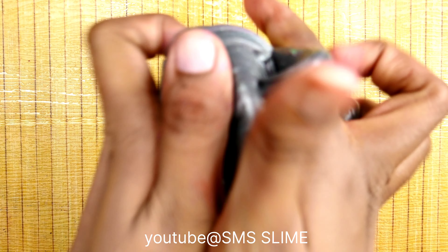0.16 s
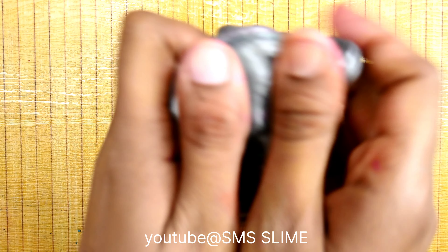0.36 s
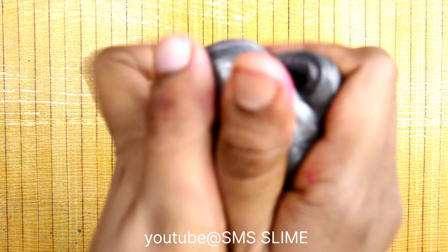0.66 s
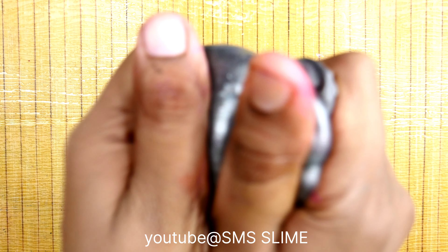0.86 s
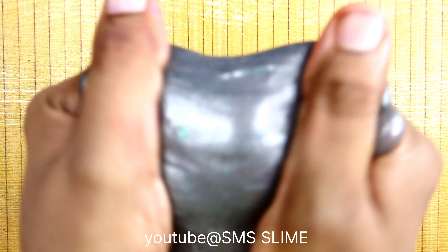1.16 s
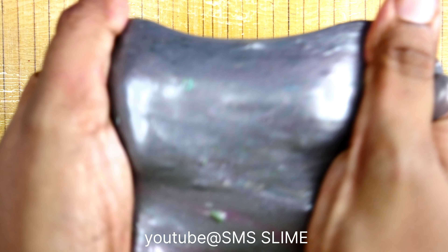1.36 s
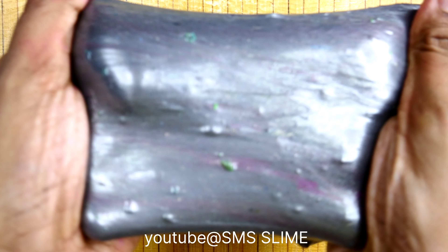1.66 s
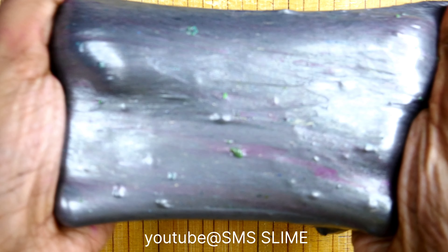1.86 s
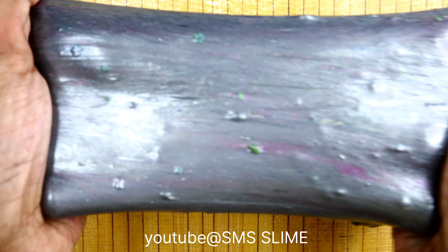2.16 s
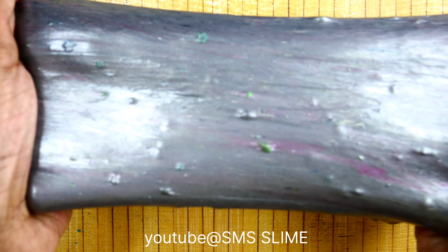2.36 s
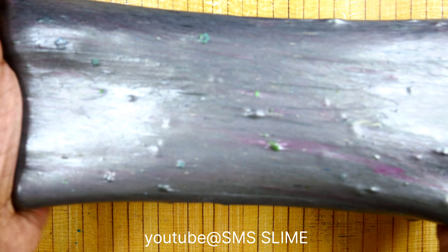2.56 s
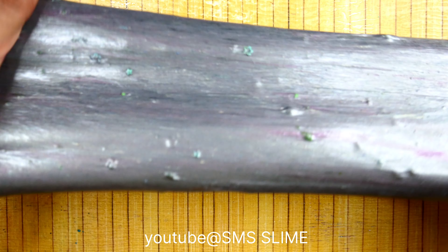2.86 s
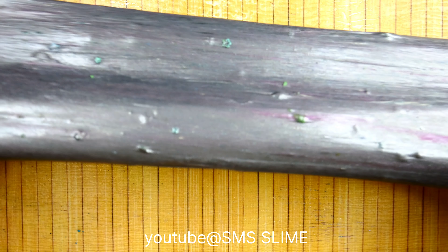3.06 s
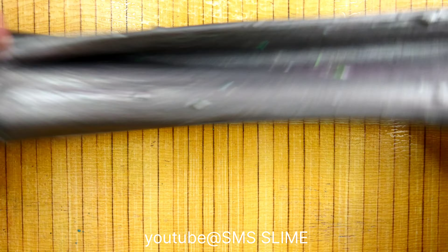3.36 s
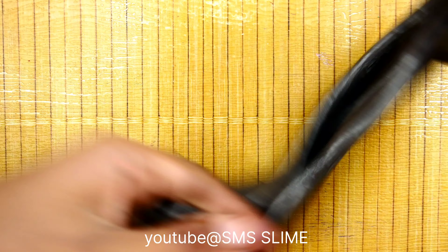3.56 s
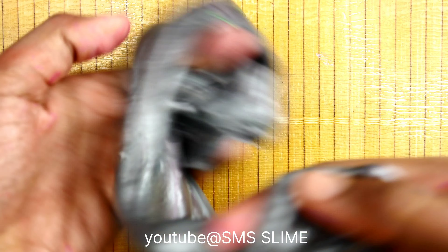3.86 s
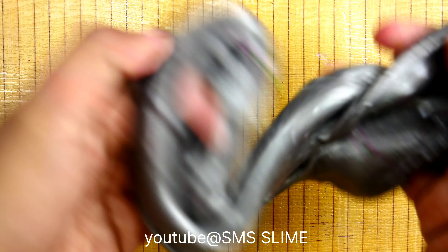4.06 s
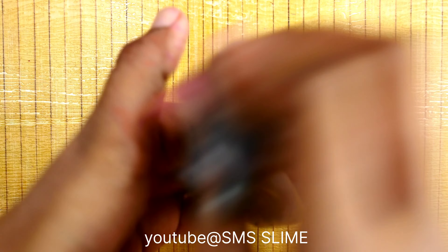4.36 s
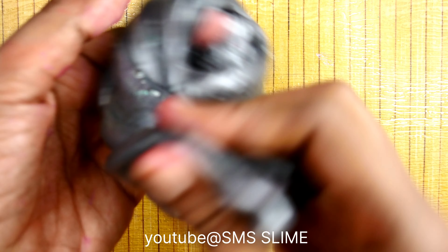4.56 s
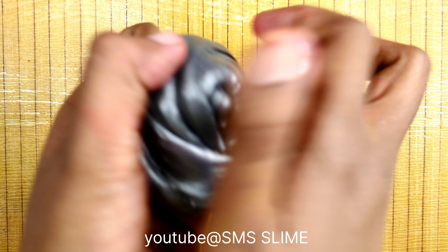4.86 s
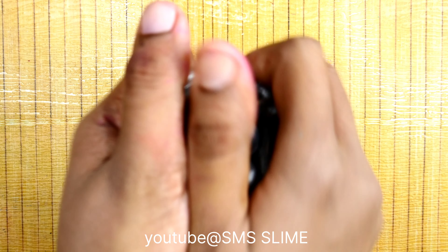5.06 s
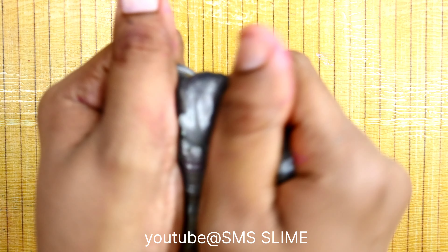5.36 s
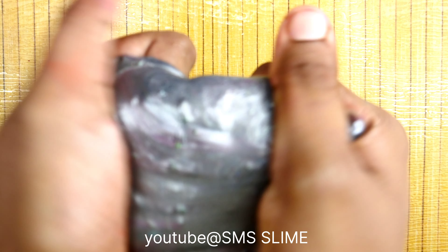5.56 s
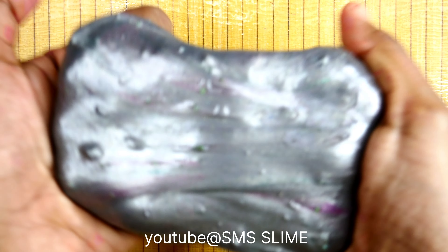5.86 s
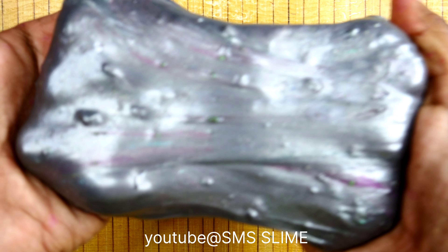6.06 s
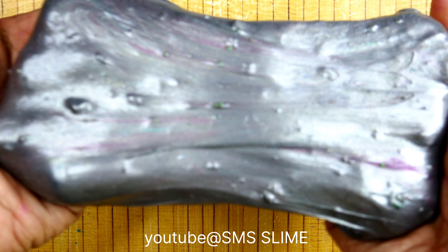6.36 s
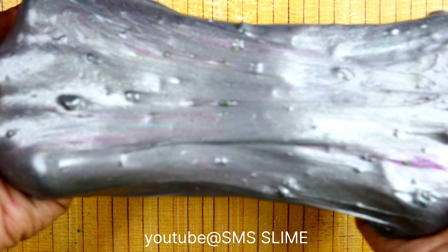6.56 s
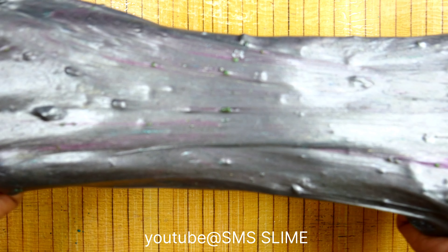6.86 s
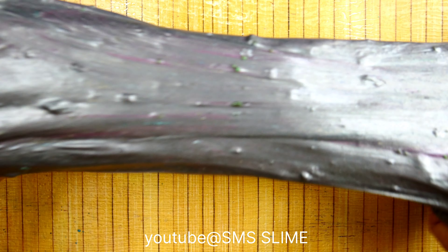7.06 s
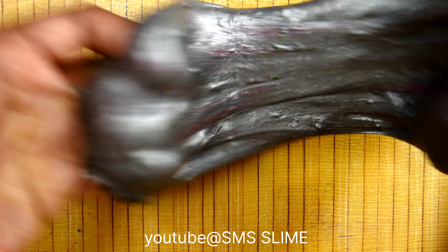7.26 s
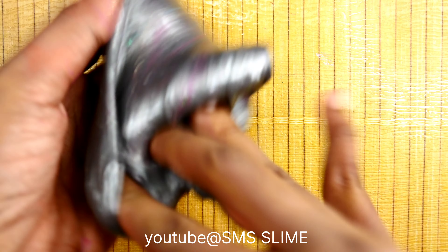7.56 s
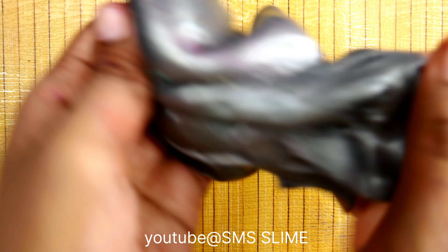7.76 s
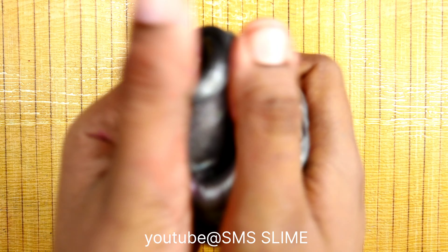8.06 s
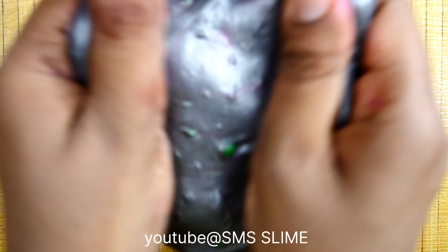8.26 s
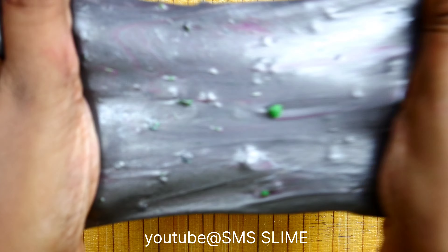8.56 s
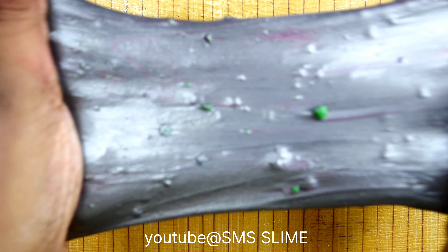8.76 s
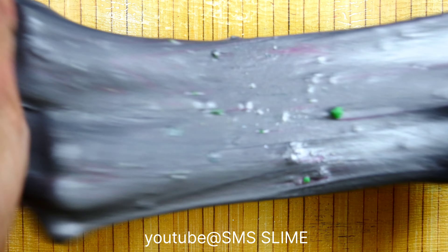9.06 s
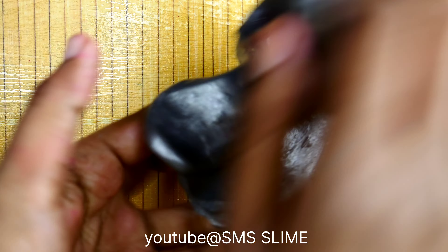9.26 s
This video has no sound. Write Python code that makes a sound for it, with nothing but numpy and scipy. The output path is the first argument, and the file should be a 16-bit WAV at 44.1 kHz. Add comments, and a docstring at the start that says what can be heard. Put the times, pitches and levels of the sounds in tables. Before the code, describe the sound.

Close up, slime gives off sticky crackles and small snapping bubbles as it is squeezed by hand. It goes quieter while being pulled out, then returns with a small plop, soft squelches and more clusters of pops as it is folded and kneaded again. Under it is the steady low hum of a fan in a small room, joined by a distant rumble in the last second or so.

```python
"""Kneading slime

Two hands knead, stretch and fold sticky slime close to the microphone in a small room.
Threads snap in dense crackle as it peels off the skin, trapped air pockets pop, and air squelches
through folds. Behind it a fan and the mains hum steadily; a low rumble swells near the end."""
import sys
import numpy as np
from scipy import signal
from scipy.fft import rfft, irfft, next_fast_len
from scipy.io import wavfile

SR = 44100
rng = np.random.default_rng(int(sys.argv[2]) if len(sys.argv) > 2 else 0)


def generate_wav(signal):
    """Clip the signal to [-1, 1] and save it as 16-bit WAV at the path in sys.argv[1]."""
    frames = np.transpose(np.atleast_2d(signal))
    scaled = np.clip(frames, -1, 1) * 32767
    pcm = np.round(scaled).astype(np.int16)
    wavfile.write(sys.argv[1], SR, pcm)


N = 414540

# Patches peeling off the skin. Each row: start in seconds, length in seconds, crackle level in dB,
# hollow rustle and sticky fizz in dB re the crackle.
PEEL_EVENTS = [ (0.089, 0.054, -57, -5, 4), (0.285, 0.08, -55.5, -9, 2), (0.452, .035, -56, -0.5, 1.5),
               (0.606, 0.029, -59, 3, 4), (0.673, .05, -59, -11, 4), (0.793, 0.023, -66, -11, -2),
               (0.936, 0.033, -52, -19, 4.5), (1.003, 0.093, -61, -3.5, -2), (1.615, 0.047, -69, -8, 4),
               (2.865, 0.13, -58.5, -6, 2.5), (3.038, 0.045, -61, -8, 2.5), (3.171, 0.013, -54.5, -3, 7.5),
               (3.276, 0.016, -51, -3, 6), (3.357, 0.071, -57.5, -7.5, 7), (3.425, 0.023, -47.5, -9, 2),
               (3.763, 0.039, -56.5, 1, 6), (3.837, 0.018, -46.5, -5, -7.5), (3.967, 0.049, -58, -11, -8),
               (4.11, 0.039, -59, -3, 6.5), (4.259, .01, -56, -4.5, -1), (4.645, 0.016, -60, -2, 4.5),
               (4.739, 0.061, -56, -6.5, -1), (4.95, 0.037, -44, -3, -1), (5.11, 0.023, -53.5, -23, -7),
               (5.304, 0.031, -51, 2.5, 3), (5.394, 0.12, -55.5, -7, 0), (5.567, 0.071, -60.5, -3.5, 5.5),
               (5.985, 0.061, -62.5, -2.5, 4), (6.102, 0.0084, -56.5, -7, -6),
               (6.794, 0.027, -61, -8, -2.5), (7.07, 0.022, -64, 5, 11.5), (7.193, 0.047, -51.5, -4, 3.5),
               (7.278, 0.014, -56.5, 4.5, 9), (7.338, 0.064, -62.5, 5.5, 7.5),
               (7.503, 0.01, -61.5, 4, 11.5), (7.591, 0.032, -64, -1, 7), (7.806, 0.046, -48, -8, -1.5),
               (7.98, 0.012, -52.5, -4, 4.5), (8.158, 0.0089, -61, 0, 4), (8.193, 0.073, -61, -5, -2.5),
               (9.091, 0.072, -53.5, -5, 6), (9.163, 0.077, -50, -3.5, 0), (9.39, 0.0085, -50.5, -5, -10)]
# Effort of the hands. Each row: time in seconds, reference level in dB for faint crackle and small pops.
KNEADING_CURVE = [(0.0, -57.5), (0.94, -55), (1.28, -60), (2.04, -70), (2.77, -68), (3.03, -62.5),
                  (3.35, -52), (3.59, -61), (4.03, -56), (4.37, -64.5), (5.44, -55), (5.68, -60.5),
                  (6.39, -66.5), (7.1, -65.5), (7.2, -58), (7.91, -55.5), (8.61, -61), (9.4, -58)]
# Spectra of the peeling layers. Each row: frequency in Hz, relative gain in dB.
HOLLOW_SPECTRUM = [(300, 6), (500, -0.5), (760, -2.5), (1000, 0), (1300, 0), (1800, -3), (2300, -24)]
CRACKLE_SPECTRUM = [(1400, -41), (2000, 1), (3000, 4.5), (4000, 1), (5000, -9.5), (6500, -7)]
FIZZ_SPECTRUM = [(3800, -11), (5200, -0.5), (7500, 1), (9000, 0.5), (11000, -6.5), (15500, -5.5)]
TICK_SPECTRUM = [(900, -8), (12000, 0)]
# Bursting air pockets. Each row: time in seconds, pocket pitch in Hz, pocket level in dB,
# film snap pitch in Hz, snap level in dB, thud level in dB.
POP_EVENTS = [(0.1275, 3590, -40, 6100, -48, -51), (0.2548, 3400, -50, 9000, -46, -57),
              (0.2662, 3400, -29.5, 6100, -27.5, -36.5), (0.6058, 3120, -39, 7600, -36, -58),
              (0.6863, 3680, -36, 5200, -53, -47), (0.741, 3300, -54, 9000, -47, -66),
              (0.791, 3120, -39.5, 11200, -37, -63), (0.8447, 2910, -35.5, 8500, -40.5, -64),
              (0.897, 4000, -37, 6770, -35.5, -54), (0.945, 3500, -51, 8500, -39, -56),
              (0.957, 2840, -33, 7900, -32, -35), (1.06, 2950, -45.5, 6800, -44.5, -60),
              (1.089, 3030, -40.5, 6200, -67, -55), (1.163, 2320, -66, 6000, -68, -52),
              (1.5636, 2210, -74, 10100, -47.5, -76), (1.6317, 2100, -51, 7100, -40.5, -55),
              (2.213, 3020, -35.5, 5400, -47, -58), (2.3726, 1490, -67, 7500, -77, -54),
              (2.5718, 1190, -57, 7700, -66, -54), (3.037, 2870, -55, 6860, -42, -68),
              (3.071, 2880, -52, 6800, -55, -60), (3.172, 2030, -55, 6800, -45, -47),
              (3.2831, 1320, -47, 6500, -42, -42), (3.5376, 1900, -43, 6800, -38, -43.5),
              (4.353, 3000, -62, 6900, -52, -62), (4.73, 4600, -55, 5800, -59, -37.5),
              (4.7398, 4540, -32.5, 6200, -29, -45), (5.202, 3420, -48, 6000, -49, -72),
              (5.279, 2600, -61, 6500, -47, -45), (5.311, 3300, -30.5, 7000, -29, -33),
              (5.33, 2850, -32, 5500, -39, -38.5), (5.3663, 3160, -39.5, 7100, -40, -54),
              (5.4126, 3500, -50, 12000, -35, -53), (5.476, 4830, -46, 6070, -38.5, -47.5),
              (5.6208, 2630, -41, 5930, -41, -57), (5.934, 2400, -52, 6000, -58, -56),
              (6.0193, 2920, -46, 7160, -39.5, -71), (6.425, 3000, -53.5, 6200, -62, -67),
              (6.8167, 3400, -45.5, 5840, -66, -73), (7.084, 4540, -62, 6340, -42, -66),
              (7.744, 2160, -48, 5570, -43.5, -46.5), (7.8398, 3640, -29.5, 5100, -47, -53),
              (8.0067, 5000, -40, 7560, -37, -66), (8.5136, 2670, -38, 6760, -48.5, -49),
              (8.6274, 3100, -47, 7400, -38, -53), (8.793, 1810, -54, 7240, -42.5, -42)]
# Air through folds. Each row: peak time in seconds, pitch in Hz, first resonance's width in Hz,
# level in dB, half length in seconds.
SQUELCH_EVENTS = [(0.135, 520, 500, -47, 0.011), (0.143, 3530, 700, -41.5, 0.015),
                  (0.49, 505, 300, -51.5, 0.0079), (.625, 600, 350, -54, 0.012),
                  (0.699, 444, 303, -52.5, 0.014), (2.884, 3100, 350, -57, 0.019),
                  (3.441, 2020, 400, -46.5, 0.013), (3.785, 1940, 303, -47.5, 0.023),
                  (3.858, 2940, 450, -51.5, 0.018), (4.051, 1364, 90, -69, 0.36),
                  (4.156, 4320, 900, -52.5, 0.026), (4.472, 726, 70, -70, .08),
                  (4.826, 3470, 600, -47.5, .008), (4.925, 1150, 300, -50, 0.016),
                  (7.248, 2690, 200, -49.5, 0.024), (7.518, 1390, 450, -52, .012),
                  (7.841, 1200, 350, -42, 0.0072), (8.245, 1140, 250, -49, 0.0062),
                  (9.245, 575, 300, -51, .009), (9.39, 2380, 600, -50, 0.0085)]
# Room tail. Each row: frequency in Hz, relative gain in dB.
ROOM_SPECTRUM = [(200, -2), (800, 3), (3300, 1), (8000, 1), (16000, 6.5)]
# Stereo width by frequency. Each row: frequency in Hz, side level in dB re the mid.
SIDE_SPECTRUM = [(200, -17), (600, -15), (2500, -19), (5000, -13.5), (9000, -12.5), (20000, -5)]
# Spectra of fan air and distant rumble. Each row: frequency in Hz, relative gain in dB.
FAN_SPECTRUM = [(22, -15), (43, -2), (85, -2.5), (150, -2), (250, -7), (400, -16.5), (700, -23.5),
                (1200, -29.5), (2000, -30.5), (4000, -35.5), (8000, -36), (11000, -36), (15500, -37)]
RUMBLE_SPECTRUM = [(28, -27), (48, -2.5), (65, -4), (85, -3.5), (150, -9.5), (250, -17), (400, -28.5),
                   (700, -44)]
# Hum lines. Each row: frequency in Hz, rms level in dB, waver in dB.
HUM_LINES = [(50, -67.5, 1), (63.2, -67.5, -4), (99.6, -58.5, 2.5), (196.6, -62, 1.5), (299.7, -74, 0)]
# Rumble swell. Each row: time in seconds, level in dB.
RUMBLE_CURVE = [(0, -71), (8.05, -65), (8.2, -47.5), (8.58, -43.5), (8.7, -51), (8.85, -43.5), (9.1, -46),
                (9.4, -45.5)]


def peeling(busy_threads_per_s=2600, busy_db=-56, clump_db=2.5, fold_db=4):
    """Faster peeling snaps more threads; they ring folds that open and close, shifting the colour."""
    hollow_gain, crackle_gain, fizz_gain = peel_gains()
    per_s = busy_threads_per_s * np.sqrt(crackle_gain / from_db(busy_db))
    clumps = from_db(clump_db * drift(rate_hz=55))
    folds = np.zeros(N)
    for hz in np.geomspace(500, 13000, 22):
        opening = from_db(fold_db * drift(rate_hz=22))
        folds += resonance(thread_snaps(per_s / 2, opening) + 1e-18, hz, q=6)
    snaps = thread_snaps(per_s, clumps) + from_db(1.5) * folds * clumps
    ticks = rms_one(coloured(cell_ticks(), TICK_SPECTRUM))
    excitation = rms_one(snaps) + from_db(-7) * ticks
    hollow = hollow_gain * rms_one(coloured(excitation, HOLLOW_SPECTRUM))
    crackle = crackle_gain * rms_one(coloured(excitation, CRACKLE_SPECTRUM))
    fizz = fizz_gain * rms_one(coloured(excitation, FIZZ_SPECTRUM))
    return hollow + crackle + fizz


def peel_gains(kneading_mix_db=(-9, -8, -7.5), release_s=0.024):
    """Gains of rustle, crackle and fizz: each peel builds, holds and dies, adding to the kneading."""
    t = np.arange(0, N, 40) / SR
    power = from_db(curve_at(t, KNEADING_CURVE) + np.array(kneading_mix_db)[:, None]) ** 2
    for start_s, length_s, db, hollow_db, fizz_db in PEEL_EVENTS:
        attack_s = 0.0044 + 0.38 * length_s
        rise = np.minimum(t - start_s, 0) / attack_s
        fall = np.maximum(t - start_s - length_s, 0) / release_s
        gains = from_db(db + np.array([[hollow_db], [0], [fizz_db]]))
        power += (gains * np.exp(rise - fall)) ** 2
    return [np.interp(np.arange(N) / SR, t, np.sqrt(layer)) for layer in power]


def thread_snaps(per_s, clumps, spread_db=-0.5):
    """Tiny threads snap at random, in uneven sizes and in clumps; rms 1."""
    snapped = rng.random(N) < per_s / SR
    sizes = from_db(spread_db * np.minimum(rng.exponential(1, N), 4)) * rng.choice([-1, 1], N)
    return rms_one(snapped * sizes * clumps / np.sqrt(per_s))


def cell_ticks(count=1500, tear_s=0.001):
    """Small air cells burst at random, each with its own size and pitch; rms 1."""
    out, t = np.zeros(N + SR), np.arange(SR // 50) / SR
    for when, pitch, smallness in rng.random((count, 3)):
        tear = rng.standard_normal(len(t)) * np.exp(-t / tear_s)
        tick = resonance(tear, hz=900 * 14 ** pitch, q=3)
        at = int(when * N)
        out[at:at + len(t)] += burst_at_db(tick, -3 * np.log(0.05 + smallness))
    return rms_one(out[:N])


def pops(slack_tear_s=0.0052, taut_above_db=-45, creak_db=-22, creak_s=0.002):
    """A film creaks, breaks and tears on briefly; the pocket rings and the lump thuds."""
    out, lead = np.zeros(N + SR), SR // 100
    t = np.arange(-lead, SR // 20) / SR
    for time_s, pocket_hz, pocket_db, snap_hz, snap_db, thud_db in POP_EVENTS:
        # A taut film pops louder and tears faster.
        excess_db = max(max(pocket_db, snap_db, thud_db) - taut_above_db, 0)
        tear_s = slack_tear_s * from_db(-0.16 * excess_db)
        creak = from_db(creak_db) * np.exp(-abs(t) / creak_s)
        strain = np.where(t < 0, creak, np.exp(-abs(t) / tear_s))
        tear = rng.choice([-1, 1], (3, len(t))) * strain
        tear[:, lead] += 2.5 * np.array([1, -1, 1])  # impulse of the break
        pocket = resonance(resonance(tear[0], pocket_hz, q=2.8), pocket_hz, q=1, order=2)
        snap = resonance(tear[1], snap_hz, q=1.64, order=2)
        thud = resonance(tear[2], hz=800, q=0.52, order=2)
        crack = film_crack(t)
        at = int(time_s * SR) - lead
        for burst, db in (pocket, pocket_db), (snap, snap_db), (thud, thud_db), (crack, snap_db - 11):
            out[at:at + len(t)] += burst_at_db(burst, db)
    return out[:N]


def film_crack(t, decay_s=0.0016):
    """The film breaks at t = 0 with a thin, bright crack."""
    tear = rng.choice([-1, 1], len(t)) * (t >= 0) * np.exp(-abs(t) / decay_s)
    return resonance(tear, hz=13500, q=1.6, order=2)


def plop(time_s=3.2918, pitch_hz=730, peak_db=-29.5, swell_s=0.0024, decay_s=0.0038):
    """One large pocket opens and its air rings at a single pitch."""
    t = np.arange(N) / SR - time_s
    log_envelope = np.maximum(np.minimum(t / swell_s, -t / decay_s), -30)
    return from_db(peak_db) * np.exp(log_envelope) * np.sin(2 * np.pi * pitch_hz * t)


def small_pops(per_s=7, low_hz=2200, high_hz=8000, tear_s=0.0043, above_kneading_db=2.5, spread_db=4.5):
    """Lone little pockets burst at random, louder while the hands work harder."""
    out, t = np.zeros(N + SR), np.arange(SR // 50) / SR
    for when, pitch, size in rng.random((int(per_s * N / SR), 3)):
        db = curve_at(when * N / SR, KNEADING_CURVE) + above_kneading_db + spread_db * (2 * size - 1)
        tear = rng.standard_normal(len(t)) * np.exp(-t / tear_s)
        pop = resonance(tear, hz=low_hz * (high_hz / low_hz) ** pitch, q=2.5, order=2)
        at = int(when * N)
        out[at:at + len(t)] += burst_at_db(pop, db)
    return out[:N]


def squelches():
    """Fluttering air rings a fold of slime, swelling and fading."""
    out = np.zeros(N)
    for peak_s, hz, width_hz, db, half_s in SQUELCH_EVENTS:
        span = np.arange(max(int((peak_s - 3 * half_s) * SR), 0), min(int((peak_s + 3 * half_s) * SR), N))
        swell = np.exp(-0.5 * ((span / SR - peak_s) / half_s) ** 2)
        air = resonance(rng.standard_normal(3 * SR)[:len(span)], hz, q=hz / width_hz)
        fold = resonance(air, hz, q=2.2)
        out[span] += from_db(db) * rms_one(fold * swell) * np.sqrt(np.mean(swell ** 2))
    return out


def room(x, scatter_db=-15, scatter_s=0.005, tail_db=-8.5, t60_s=0.35):
    """A quick scatter off hands and table, then a soft tail."""
    t = np.arange(int(0.6 * SR)) / SR
    tail = coloured(rng.standard_normal(len(t)), ROOM_SPECTRUM) * from_db(-60 * t / t60_s) * (t > 0.005)
    tail *= from_db(tail_db) / np.linalg.norm(tail)
    scatter = rng.standard_normal(len(t)) * np.exp(-t / scatter_s) * (t > 0.001)
    scatter *= from_db(scatter_db) / np.linalg.norm(scatter)
    return x + signal.fftconvolve(x, scatter + tail)[:N]


def stereo_width(x):
    """A fluttering left-right difference widens the sound, mostly in the treble."""
    quadrature = signal.hilbert(x, next_fast_len(N)).imag[:N]
    side = coloured(quadrature * drift(rate_hz=120), SIDE_SPECTRUM)
    return np.array([x + side, x - side])


def fan(level_db=-54.5):
    """Steady noise of moving air."""
    return from_db(level_db) * diffuse_noise(FAN_SPECTRUM, side_db=-20)


def hum(phase_waver_rad=0.48):
    """Fan and mains hum, each line wavering in level and phase."""
    out, t = np.zeros(N), np.arange(N) / SR
    for hz, db, waver_db in HUM_LINES:
        waver = from_db(waver_db * drift(rate_hz=1.35))
        phase_rad = 2 * np.pi * hz * t + phase_waver_rad * drift(rate_hz=1.8)
        out += from_db(db) * rms_one(waver * np.sin(phase_rad))
    return out


def rumble():
    """A distant low rumble swells near the end."""
    level_db = curve_at(np.arange(N) / SR, RUMBLE_CURVE)
    return from_db(level_db) * diffuse_noise(RUMBLE_SPECTRUM, side_db=-24)


def hiss(level_db=-87):
    """Faint white noise, independent in each channel."""
    return from_db(level_db) * rng.standard_normal((2, N))


def diffuse_noise(spectrum, side_db):
    """Coloured noise, nearly the same in both channels."""
    mid, side = [rms_one(coloured(noise, spectrum)) for noise in rng.standard_normal((2, N))]
    return mid + from_db(side_db) * side * np.array([[1], [-1]])


def coloured(x, spectrum):
    """Filter by a smooth spectrum, falling 12 dB per octave beyond its ends."""
    hz, db = np.transpose(spectrum)
    size = next_fast_len(x.shape[-1])
    bins_hz = np.maximum(np.fft.rfftfreq(size, 1 / SR), 1)
    skirts = np.minimum(bins_hz / hz[0], 1) ** 2 * np.minimum(hz[-1] / bins_hz, 1) ** 2
    gain = from_db(np.interp(np.log(bins_hz), np.log(hz), db)) * skirts
    return irfft(rfft(x, size) * gain, size)[..., :x.shape[-1]]


def resonance(x, hz, q, order=1):
    """Causal band-pass around hz."""
    edge_ratio = np.exp(np.arcsinh(0.5 / q))
    edges_hz = [min(hz / edge_ratio, 0.35 * SR), min(hz * edge_ratio, 0.45 * SR)]
    return signal.sosfilt(signal.butter(order, edges_hz, "band", fs=SR, output="sos"), x)


def drift(rate_hz, hop=40, settle_steps=2000):
    """Smooth random wander; rms 1."""
    pole = np.exp(-2 * np.pi * rate_hz * hop / SR)
    noise = rng.standard_normal(N // hop + settle_steps + 2)
    slow = signal.lfilter([1], [1, -2 * pole, pole * pole], noise)[settle_steps:]
    return np.interp(np.arange(N) / hop, np.arange(len(slow)), rms_one(slow))


def burst_at_db(x, db):
    """Scale a burst to the energy of 5 ms at the given level."""
    return from_db(db) * x * np.sqrt(0.005 * SR / (np.sum(x ** 2) + 1e-20))


def curve_at(time_s, curve):
    """Interpolate rows of time and value."""
    return np.interp(time_s, *np.transpose(curve))


def from_db(db):
    """Decibels to gain."""
    return 10 ** (np.asarray(db) / 20)


def rms_one(x):
    """Scale to unit rms."""
    return x / np.sqrt(np.mean(x ** 2) + 1e-20)


def scene():
    """Slime in its room over the background, slightly louder on the left."""
    slime = stereo_width(room(pops() + plop() + squelches() + peeling() + small_pops()))
    background = fan() + hum() + rumble() + hiss()
    return (slime + background) * from_db([[0.25], [-0.25]])


def record(dry):
    """Steep low-pass on the top treble."""
    cutoff_hz = 16000
    return signal.sosfilt(signal.ellip(10, 0.1, 70, cutoff_hz, fs=SR, output="sos"), dry, axis=-1)


dry = scene()
out = record(dry)
generate_wav(out)
```